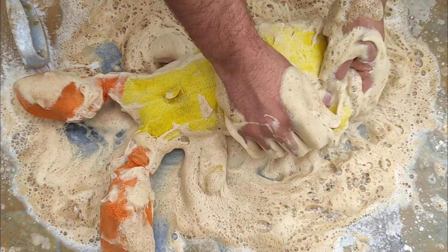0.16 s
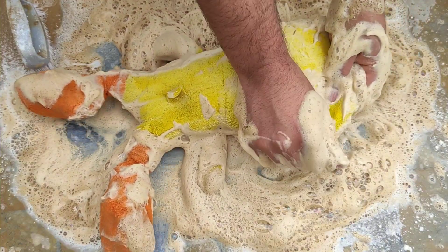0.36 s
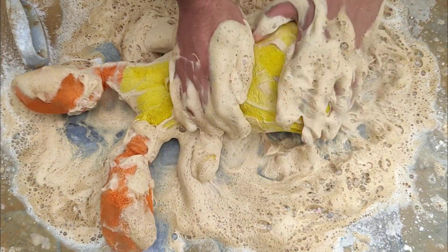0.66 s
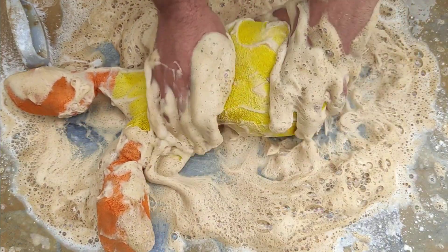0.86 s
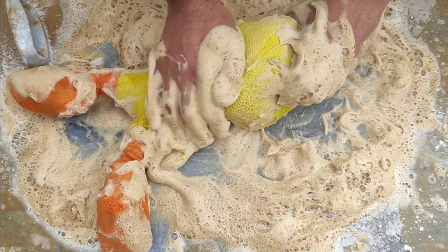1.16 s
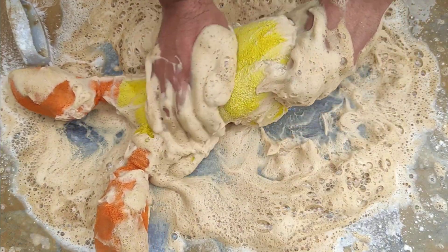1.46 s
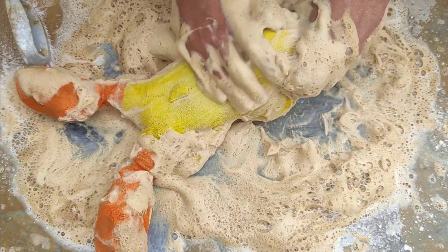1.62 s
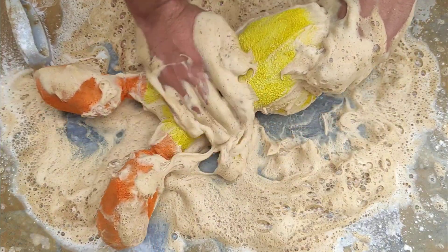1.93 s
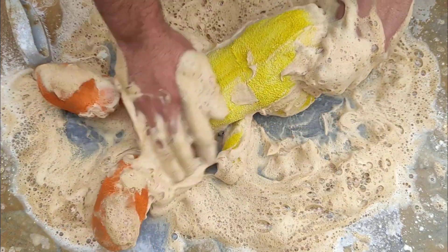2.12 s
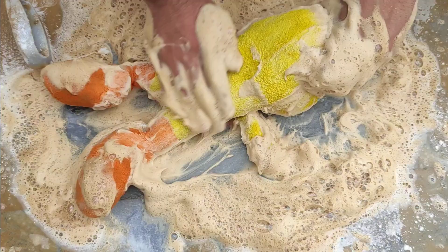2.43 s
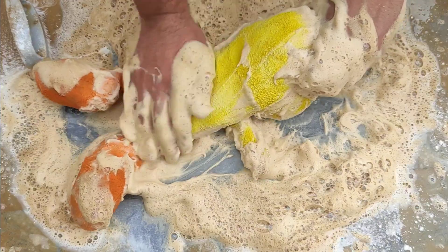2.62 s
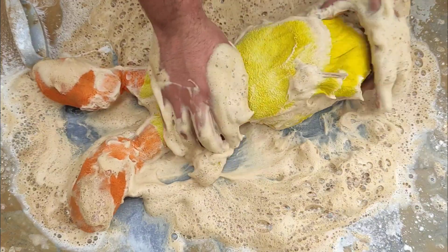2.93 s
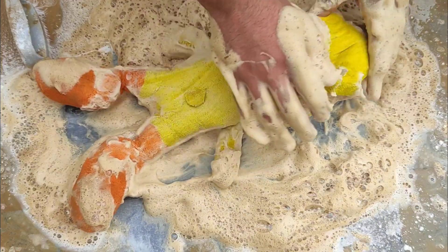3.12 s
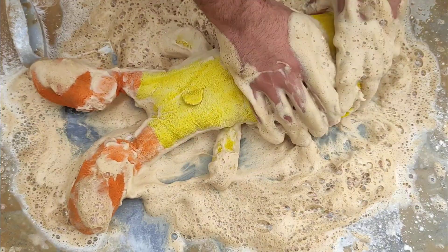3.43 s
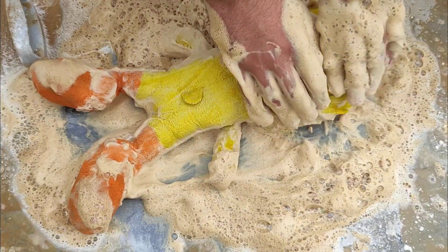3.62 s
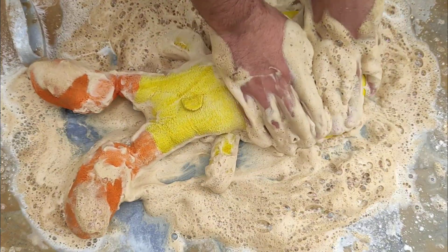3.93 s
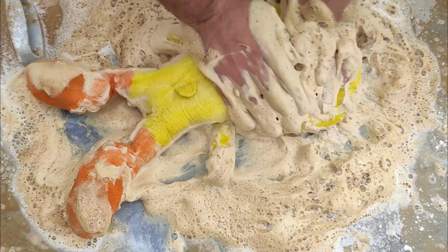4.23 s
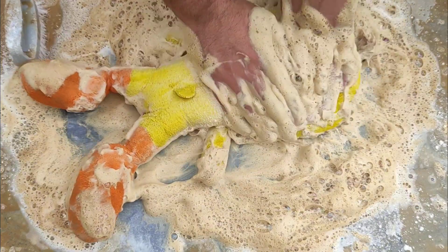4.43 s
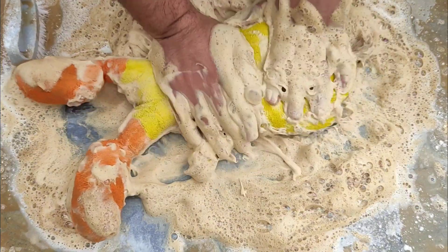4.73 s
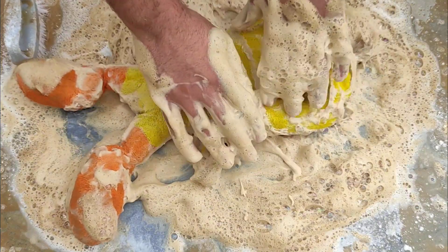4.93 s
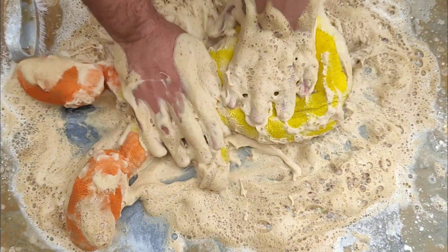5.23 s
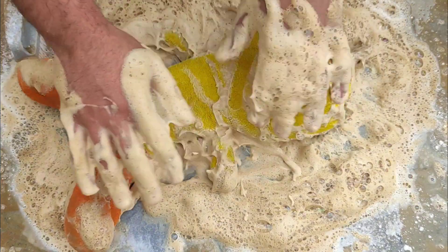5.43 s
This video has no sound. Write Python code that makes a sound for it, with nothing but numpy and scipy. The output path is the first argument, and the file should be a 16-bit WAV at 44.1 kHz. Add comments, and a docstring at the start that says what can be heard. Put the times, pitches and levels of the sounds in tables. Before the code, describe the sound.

Heard very close in stereo, hands knead a plush toy soaked with thick soap foam on a wet floor. From 0 to 3 s, quiet strokes come several per second, each a short swell of squelch, watery gurgle and fine fizz, with a few small plops, a clearer one at 2.04 s and a faint high squeak around 1.6 s. At 3.2 s a wet smack and sharp bubble snaps lead to a squeeze with low, hollow plops at 3.3 s. It calms, then foam oozes out near 3.75 s. Tiny crisp snaps cluster around 4.0 s, a brief rising slurp follows at 4.15 s, and a stronger squeeze gushes at 4.25 s. The loudest wet burst hits at 4.75 s with popping air and crackles trailing. Another plopping squeeze comes at 5.2 s, then low sloshing and a weak final squish near 5.57 s. Faint room air, short hard reflections.

```python
"""Bare hands knead a plush toy soaked in thick soap foam, close to the microphone on a wet floor.
Each stroke sets random bubbles of four sizes ringing, from sloshing pockets in the stuffing to fizzing lather.
Smacks and hard squeezes drive out gushes of foam, decaying sine tones are trapped air plopping free,
and cracks with brief pings are soap films snapping. Air whistles and slurps out as noise on a gliding pitch.
Faint room air lies beneath; the foam also scatters off floor and arms and leaves a short tail from hard walls."""
import sys
import numpy as np
from scipy import signal
from scipy.fft import rfft, irfft
from scipy.io import wavfile

SR = 44100
rng = np.random.default_rng(int(sys.argv[2]) if len(sys.argv) > 2 else 0)


def master(y):
    """Save y as 16-bit WAV."""
    cut = np.clip(np.atleast_2d(y).T, -1, 1)
    pcm = np.round(cut * 32767)  # scale
    wavfile.write(sys.argv[1], SR, pcm.astype(np.int16))


N = 245637
TIME = np.arange(N) / SR  # s

# Levels in the tables are those of the sources, ahead of mix, room and microphone. Hand strokes through the
# lather, and at 4.02 s a fizzing swell that trails the film snaps; water and fizz are relative to the squelch:
# crest_s, length_s, squelch_db, water_db, fizz_db
STROKES = [ (0.01, 0.15, -64.5, 6.5, -10), (0.22, 0.15, -58.5, -1, -4), (0.289, 0.11, -57, 1.5, -13),
           (0.55, 0.23, -62, -1, -3.5), (0.682, 0.052, -54.5, 3, -6), (0.80, 0.24, -68, -0.5, -2.5),
           (0.998, 0.13, -54, -1.5, -2.5), (1.132, 0.15, -59, 1.5, -1), (1.272, .14, -59.5, -5.5, 2),
           (1.361, 0.14, -57.5, -0.5, -3), (1.447, 0.091, -57.5, 2, 0.5), (1.531, 0.062, -65.5, 11.5, 2),
           (1.588, 0.088, -60, 4, 1.5), (1.65, 0.046, -65.5, 12, -15), (1.753, 0.12, -55.5, 2.5, 1.5),
           (1.927, 0.1, -59.5, 7, -0.5), (1.991, 0.072, -63, 12.5, -3), (2.057, 0.089, -53.5, 2, -2.5),
           (2.131, 0.065, -59.5, 5.5, -11), (2.228, 0.094, -58.5, 6.5, 1), (2.363, .08, -52.5, -1, -3),
           (2.484, 0.11, -58.5, 5, 3.5), (2.654, 0.1, -60, 12, 1), (2.758, 0.083, -57, 7.5, 4.5),
           (2.898, 0.09, -54, -2, 0), (3.01, 0.24, -64, -3, -2), (3.49, 0.11, -63, -8, -1.5),
           (3.662, 0.24, -72, -2, 5), (3.95, 0.057, -64.5, 2, -2), (4.019, 0.11, -56.5, 0, 3.5),
           (4.195, 0.14, -57.5, -1, 2.5), (4.41, 0.065, -62, 1.5, -4), (4.512, 0.16, -56.5, 3.5, -2),
           (4.919, 0.13, -58, 2.5, -1), (5.348, .14, -57, 1.5, -2)]
STROKE_RISE_SHARE = 0.5  # part of a stroke's length spent swelling
STROKE_SLOSH_DB = -5  # deep sloshing of a stroke, against its gurgle
# Water seeping through the stuffing: time_s, slosh_db, gurgle_db
SEEPING_WATER = [(0.0, -63.5, -63.5), (0.49, -61, -57), (0.9, -61.5, -59.5), (1.27, -62, -57),
                 (1.91, -62.5, -51), (2.19, -60.5, -55.5), (2.62, -63, -55.5), (2.99, -60.5, -64),
                 (3.72, -60.5, -65.5), (3.97, -61.5, -57), (4.24, -55, -53.5), (4.47, -53, -59.5),
                 (5.01, -55.5, -57.5), (5.2, -48, -60.5), (5.37, -50, -63.5), (5.57, -54.5, -66.5)]
WATER_SLOSH_DB, WATER_GURGLE_DB = 1, -2  # added to the two levels above
LATHER_SQUELCH_DB, LATHER_FIZZ_DB = -75, -77  # the lather crackles on between strokes

# Pitch ranges of the four bubble sizes: low_hz, high_hz
SLOSH, GURGLE, SQUELCH, FIZZ = (70, 250), (250, 900), (900, 3500), (3500, 15500)
SIZE_SPREAD_DB = 3  # scatter of the bubbles' strength
# Spread of kneading sound over bubble pitch: pitch_hz, density_db (per Hz)
KNEAD_COLOUR = [(35, -41), (60, -15), (96, 10.5), (179, -16.5), (220, -0.5), (413, 1.5), (559, -13.5),
                (721, -3.5), (953, -22.5), (1550, -20), (2150, -26), (7200, -35.5), (8670, -36.5),
                (12000, -31), (15500, -64)]
# Spread of gushing sound over bubble pitch: pitch_hz, density_db (per Hz)
GUSH_COLOUR = [(120, -30), (200, -0.5), (399, -8), (653, -19.5), (742, 4.5), (827, -50), (992, -1),
               (1150, -16), (1380, -6.5), (1950, -12), (2560, -10), (5490, -28.5), (6590, -31.5),
               (12000, -27.5), (15500, -38)]

# Still air of the room: frequency_hz, density_db (per Hz)
AIR_COLOUR = [(18, -49), (30, -47), (97, 2.5), (177, 2.5), (332, -1), (575, -5.5), (1470, -7.5),
              (2020, -11.5), (5040, -18), (11900, -25), (15500, -28)]
AIR_DB = -62  # ahead of the microphone

# Larger air pockets breaking out of the stuffing: start_s, peak_db, pitch_hz, t60_s
PLOPS = [ (0.571, -39, 283, 0.043), (0.616, -38, 700, 0.0074), (1.008, -37, 204, 0.048),
         (1.849, -40.5, 1050, 0.025), (2.042, -20.5, 446, 0.011), (2.379, -27.5, 825, 0.007),
         (2.430, -38.5, 686, 0.02), (2.774, -35, 142, 0.041), (3.314, -27, 142, 0.11),
         (3.315, -24, 206, 0.092), (3.327, -32.5, 306, 0.039), (3.734, -46, 600, 0.029),
         (3.780, -38, 310, 0.068), (4.012, -29.5, 293, 0.02), (4.239, -23, 138, 0.041),
         (4.268, -18.5, 236, 0.095), (4.274, -21.5, 126, 0.062), (4.282, -21.5, 330, 0.037),
         (4.525, -32, 131, 0.047), (4.712, -25, 148, 0.076), (4.746, -17, 133, .046),
         (4.748, -7.5, 305, 0.02), (4.751, -14.5, 724, 0.033), (4.751, -9, 1130, 0.0091),
         (4.754, -12.5, 1440, 0.011), (5.131, -27, 142, 0.058), (5.182, -19, 112, 0.077),
         (5.188, -12, 265, 0.02), (5.188, -17.5, 400, 0.017), (5.315, -26.5, 156, 0.071)]
# Air whistling through a pinhole in the lather: time_s, pitch_hz, level_db
WHISTLE = [(1.53, 4700, -78), (1.575, 4610, -66), (1.61, 4450, -70), (1.67, 4120, -69), (1.71, 3980, -73)]
# Air slurping through a narrowing gap under the palm: time_s, pitch_hz, level_db
SLURP = [(4.1, 650, -58), (4.134, 1214, -48), (4.17, 1417, -48.5), (4.2, 1600, -67)]
# Single soap films snapping: start_s, peak_db, pitch_hz, left_minus_right_db
SNAPS = [ (2.044, -32, 1330, -1), (3.1987, -26.5, 11700, 19.5), (3.199, -37, 5000, 10),
         (3.253, -33, 12100, -1), (3.829, -34, 4200, 10), (3.852, -29, 3980, 7), (3.9743, -27.5, 6950, -8),
         (3.997, -22, 8100, -17), (4.0202, -26.5, 8870, -18), (4.0397, -22.5, 9100, -16),
         (4.040, -28.5, 3540, -6), (4.0434, -26, 11000, -2), (4.3064, -33, 1790, -5),
         (4.754, -20, 8340, -17), (4.7555, -19, 3000, 5), (4.777, -24, 2500, -3), (4.788, -24, 3000, 0),
         (4.8, -28, 2700, -3), (4.809, -29, 2800, -4), (4.824, -29, 2400, 2)]

# Palm or finger smacking the foam; water and fizz are relative to the squelch:
# crest_s, squelch_db, water_db, fizz_db, fall_s
SMACKS = [ (3.181, -49.5, -6.5, -13, .01), (3.199, -46, -10, -8.5, 0.015), (4.2406, -44, 2, -5.5, 0.026),
          (4.713, -46.5, 5, 1.5, 0.023), (5.133, -59.5, 8, 2.5, 0.032), (5.147, -52.5, -8, 0, .02),
          (5.548, -60.5, 4, 14, 0.012)]
SMACK_RISE_S = 0.0011
# Hard squeezes; water and fizz are relative to the burst or outflow:
# give_way_s, burst_db, outflow_delay_s, outflow_db, water_db, fizz_db
SQUEEZES = [ (3.317, -42.5, 0.023, -49, 1, -0.5), (3.785, -53.5, 0.043, -36, -5.5, -3.5),
            (4.271, -36, .039, -36, 1, -3), (4.754, -25.5, .023, -33.5, -2, -8.5),
            (5.188, -36, .026, -44, 1.5, -3), (5.571, -45, 0.065, -57, 5, 3.5)]
BURST_RISE_S, BURST_FALL_S = 0.0057, 0.011
OUTFLOW_RISE_S, OUTFLOW_FALL_S = 0.021, 0.031
BURST_WATER_DB, BURST_FIZZ_DB = 0, -0.5  # colour of the burst, against the outflow

# Resonances of the space between hands, toy and floor: pitch_hz, width_hz, lift_db
HOLLOW = [(305, 6.8, 2), (400, 77, 2), (723, 69, 4), (1250, 56, 8.5), (1700, 72, 1.5)]
# Resonance of the microphone port: pitch_hz, width_hz, lift_db
PORT = [(8780, 690, 3.5)]
# Stereo width: frequency_hz, side_minus_mid_db
WIDTH = [(60, -16), (130, -7.5), (300, -12), (700, -6.5), (1400, -4), (3000, -1), (6000, -1), (14000, 0)]
# Stereo balance: frequency_hz, left_minus_right_db
BALANCE = [(100, -4.5), (300, -3), (2500, -2), (5500, -3), (9500, -10.5), (12500, 9)]
CUTOFF_HZ = 15600


def from_db(db):
    """Decibels to gain."""
    return 10 ** (np.asarray(db) / 20)


def in_time(rows):
    """Each column of a curve at every sample."""
    s, *columns = np.transpose(rows)
    return [np.interp(TIME, s, column) for column in columns]


def at_hz(points, hz):
    """Read a table on a log-frequency axis."""
    f, value = np.transpose(points)
    return np.interp(np.log(hz), np.log(f), value)


def panned(db):
    """Left and right gain for a level difference."""
    return from_db(np.array([[db], [-db]]).reshape(2, -1) / 2)


def stereo(mid, side, hz):
    """Mid and side to left and right, with width and balance that depend on frequency."""
    spread = from_db(at_hz(WIDTH, hz)) * side * [[1], [-1]]
    return (mid + spread) * panned(at_hz(BALANCE, hz))


def bubble_filter(hz, cycles):
    """A resonance that falls 60 dB in so many cycles, with softened skirts; unit energy."""
    w = 2 * np.pi * hz / SR
    r = np.exp(-np.log(1000) * hz / (cycles * SR))
    ring = [1, 0, -1, 1, -2 * r * np.cos(w), r * r]
    skirts = signal.butter(1, [hz / 2, min(hz * 2, 20000)], "band", fs=SR, output="sos")
    sos = np.vstack([ring, skirts])
    sos[0, :3] /= np.linalg.norm(signal.sosfilt(sos, signal.unit_impulse(8192)))
    return sos


def bubbles(level, band, colour, per_s, cycles, count):
    """Random bubbles ring at `count` pitches; more flow brings both more and stronger ones."""
    # per_s is the rate at a level of -55 dB
    chance = np.clip(per_s / SR * level / from_db(-55), 1e-6, 1)
    sizes = from_db(SIZE_SPREAD_DB * np.clip(rng.standard_normal(N), -2, 2))
    mean_power = np.mean(sizes ** 2)
    born = rng.random(N) < chance
    sizes *= level * born / np.sqrt(chance * mean_power)
    mid = sizes * rng.choice([-1, 1], N)
    side = sizes * rng.standard_normal(N)

    edges = np.geomspace(*band, count + 1)
    pitches = np.sqrt(edges[1:] * edges[:-1])
    dealt = rng.integers(0, count, N)  # which pitch each bubble gets
    # density per Hz times a bandwidth that grows with pitch
    weights = from_db(at_hz(colour, pitches)) * np.sqrt(pitches)
    weights /= np.sqrt(np.mean(weights ** 2))

    out = np.zeros((2, N))
    for k, hz in enumerate(pitches):
        mine = weights[k] * (dealt == k)
        strikes = stereo(mid * mine, side * mine, hz) + 1e-18  # avoids denormal numbers
        out += signal.sosfilt(bubble_filter(hz, cycles), strikes)
    return out


def foam_power(flow, db, water_db, fizz_db):
    """Power of gurgle, squelch and fizz; wet foam gurgles, airy foam fizzes."""
    levels = from_db([db + water_db, db, db + fizz_db])
    return (levels[:, None] * flow) ** 2


def kneading():
    """Slow strokes swell and fade, working water through the stuffing and crushing the lather on top."""
    power = np.zeros((3, N))
    for s, length, db, water_db, fizz_db in STROKES:
        reach = length * np.where(TIME < s, STROKE_RISE_SHARE, 1 - STROKE_RISE_SHARE)
        swell = np.exp(-np.minimum(((TIME - s) / reach) ** 2, 30))
        power += foam_power(swell, db, water_db, fizz_db)
    big, medium, small = np.sqrt(power)

    # strokes add in power to the steady water and lather
    slosh_db, gurgle_db = in_time(SEEPING_WATER)
    slosh = np.hypot(from_db(slosh_db + WATER_SLOSH_DB), from_db(STROKE_SLOSH_DB) * big)
    gurgle = np.hypot(from_db(gurgle_db + WATER_GURGLE_DB), big)
    squelch = np.hypot(from_db(LATHER_SQUELCH_DB), medium)
    fizz = np.hypot(from_db(LATHER_FIZZ_DB), small)
    return (bubbles(slosh, SLOSH, KNEAD_COLOUR, per_s=1200, cycles=9.5, count=8)
            + from_db(-1.0) * bubbles(gurgle, GURGLE, KNEAD_COLOUR, per_s=1300, cycles=6.6, count=14)
            + from_db(-2.0) * bubbles(squelch, SQUELCH, KNEAD_COLOUR, per_s=4000, cycles=21.5, count=16)
            + from_db(-1.26) * bubbles(fizz, FIZZ, KNEAD_COLOUR, per_s=35000, cycles=15.0, count=14))


def resonate(x, peaks):
    """Each resonance lifts the sound around its pitch and rings on a little."""
    out = x
    for hz, width, db in peaks:
        b, a = signal.iirpeak(hz, hz / width, fs=SR)
        out = out + (from_db(db) - 1) * signal.lfilter(b, a, x)
    return out


def room(x, near_db=-8, near_t60=0.029, far_db=-16, far_t60=0.16, low_hz=600):
    """Quick scatter off the floor and arms, then a short tail from hard walls, as decaying noise."""
    t = TIME[:SR // 2]
    echo = 0
    for db, t60 in ((near_db, near_t60), (far_db, far_t60)):
        tail = rng.standard_normal((2, len(t))) * from_db(-60 * t / t60) * (t > 0.001)
        echo = echo + from_db(db) * tail / np.linalg.norm(tail, axis=1, keepdims=True)
    echo = signal.sosfilt(signal.butter(1, low_hz, "high", fs=SR, output="sos"), echo)
    return x + signal.fftconvolve(x, echo, axes=1)[:, :N]


def air():
    """A faint steady rumble and hiss: noise shaped by frequency."""
    hz = np.maximum(np.fft.rfftfreq(N, 1 / SR), 1)
    mid, side = rfft(rng.standard_normal((2, N))) * from_db(at_hz(AIR_COLOUR, hz))
    noise = irfft(stereo(mid, side, hz), N)
    return from_db(AIR_DB) * noise / noise.std()


def plops(glide=0.16, opening_cycles=0.25):
    """An air pocket opens within a cycle and rings, its pitch rising as it empties."""
    out = np.zeros((2, N))
    for s, db, hz, t60 in PLOPS:
        start = int(s * SR)
        t = TIME[:min(int(2 * t60 * SR), N - start)]
        opening = 1 - np.exp(-t * hz / opening_cycles)
        swing = from_db(db - 60 * t / t60) * opening
        ring = swing * np.sin(2 * np.pi * hz * t * (1 + glide * t / t60))
        out[:, start:start + len(t)] += ring * panned(at_hz(BALANCE, hz))
    return out


def escaping_air(rows, width_hz, steady):
    """Air rushing through a wet gap sounds the gap's moving resonance; a steady jet makes it a tone."""
    hz, db = in_time(rows)
    lowpass = signal.butter(2, width_hz, fs=SR, output="sos")
    waver = signal.sosfilt(lowpass, rng.standard_normal((2, N)))
    swing = (waver / waver.std() + steady) / np.hypot(1, steady)
    sounding = (TIME > rows[0][0]) & (TIME < rows[-1][0])
    tone = np.sqrt(2) * np.sin(2 * np.pi * np.cumsum(hz) / SR)
    mid, side = sounding * from_db(db) * swing * tone
    return stereo(mid, side, hz)


def snaps(cycles=10, crack=0.21, crack_cycles=7):
    """A film tears with a tiny crack and its bubble rings for a few cycles."""
    out, t = np.zeros((2, N)), TIME[:SR // 100]
    for s, db, hz, pan_db in SNAPS:
        band = signal.butter(1, [hz / 5, hz * 1.2], "band", fs=SR, output="sos")
        rip = signal.sosfilt(band, rng.standard_normal((2, len(t))))
        tear = crack * rip / rip.std() * np.exp(-t * hz / crack_cycles)
        ping = np.sin(2 * np.pi * hz * t) * from_db(-60 * t * hz / cycles)
        sound = from_db(db) * (ping + tear) * panned(pan_db)
        # each ear hears it 0 to 3 samples late
        for ear, lag in enumerate(rng.integers(0, 4, size=2)):
            start = min(int(s * SR) + lag, N - len(t))
            out[ear, start:start + len(t)] += sound[ear]
    return out


def surge(s, rise, fall):
    """Flow that grows exponentially to a crest and dies away."""
    return np.exp(np.maximum(-np.maximum((s - TIME) / rise, (TIME - s) / fall), -30))


def gushes():
    """Hands smack the foam; squeezed foam gives way in a burst, then a slower outflow drains the pressure."""
    power = np.zeros((3, N))
    for s, db, water_db, fizz_db, fall in SMACKS:
        power += foam_power(surge(s, SMACK_RISE_S, fall), db, water_db, fizz_db)
    for s, burst_db, delay, outflow_db, water_db, fizz_db in SQUEEZES:
        burst = surge(s, BURST_RISE_S, BURST_FALL_S)
        outflow = surge(s + delay, OUTFLOW_RISE_S, OUTFLOW_FALL_S)
        power += foam_power(burst, burst_db, water_db + BURST_WATER_DB, fizz_db + BURST_FIZZ_DB)
        power += foam_power(outflow, outflow_db, water_db, fizz_db)
    gurgle, squelch, fizz = np.sqrt(power)
    return (from_db(1.5) * bubbles(gurgle, GURGLE, GUSH_COLOUR, per_s=210, cycles=5.7, count=12)
            + from_db(-2.2) * bubbles(squelch, SQUELCH, GUSH_COLOUR, per_s=590, cycles=25, count=16)
            + from_db(-2.5) * bubbles(fizz, FIZZ, GUSH_COLOUR, per_s=4500, cycles=3.5, count=12))


def scene():
    """The toy and its foam on the floor, with the room around them."""
    whistle = escaping_air(WHISTLE, width_hz=69, steady=2.2)
    slurp = escaping_air(SLURP, width_hz=740, steady=0)
    foam = kneading() + from_db(-1.57) * plops() + whistle + from_db(-0.4) * snaps() + gushes() + slurp
    return room(resonate(foam, HOLLOW)) + air()


def record(dry):
    """The microphone thins the deep bass and its port adds sheen; the top is cut."""
    bass_cut = signal.butter(3, 52, "high", fs=SR, output="sos")
    thinned = signal.sosfilt(bass_cut, resonate(dry, PORT))
    top_cut = signal.ellip(10, 0.2, 80, CUTOFF_HZ, fs=SR, output="sos")
    return signal.sosfilt(top_cut, thinned)


dry = scene()
out = record(dry)
master(out)
```